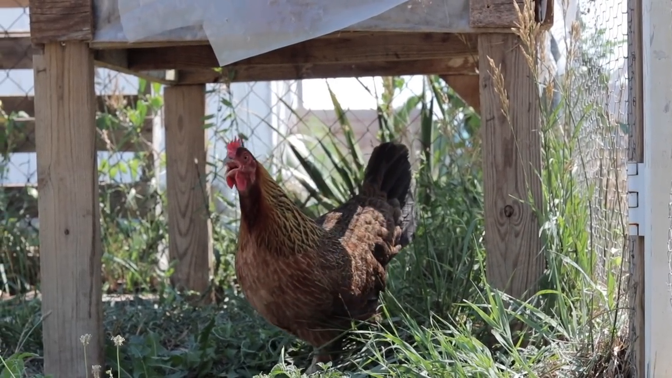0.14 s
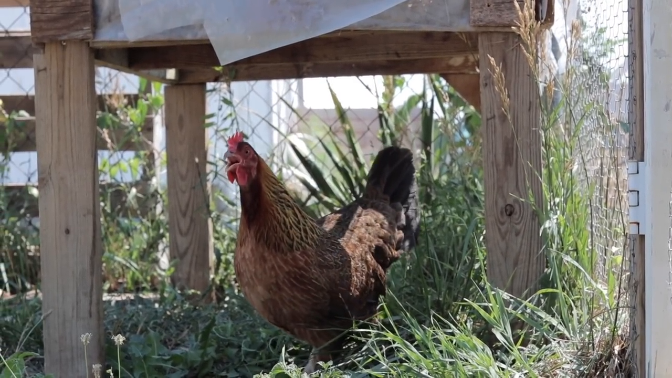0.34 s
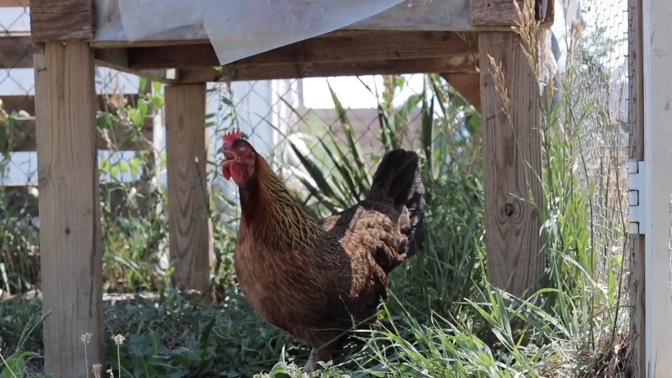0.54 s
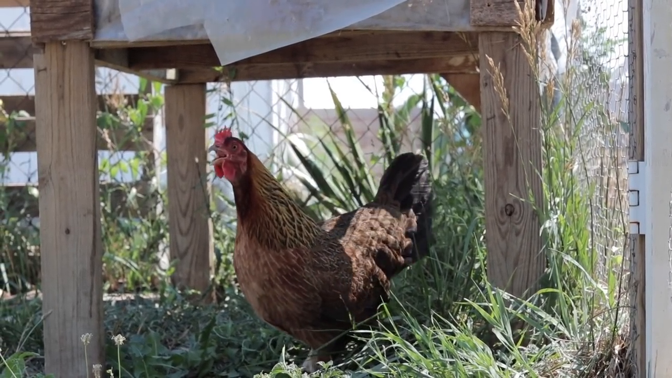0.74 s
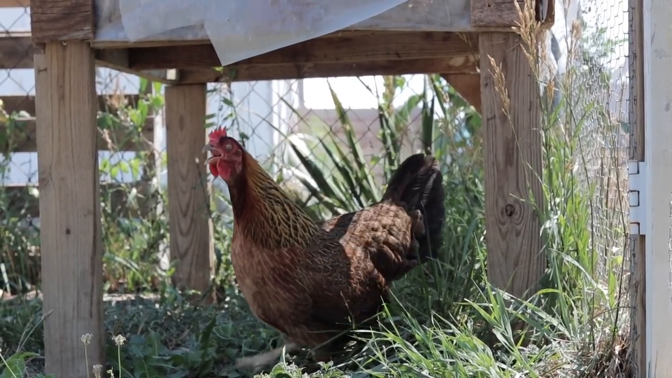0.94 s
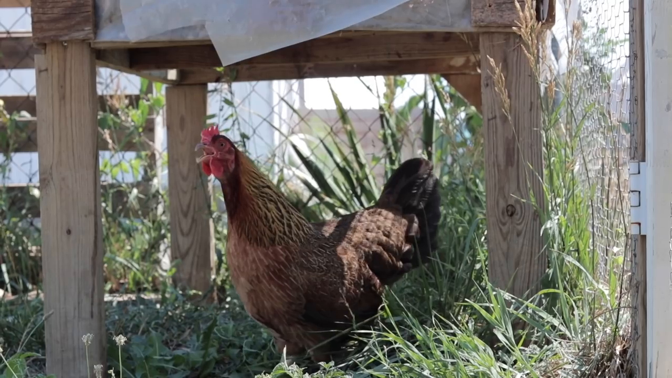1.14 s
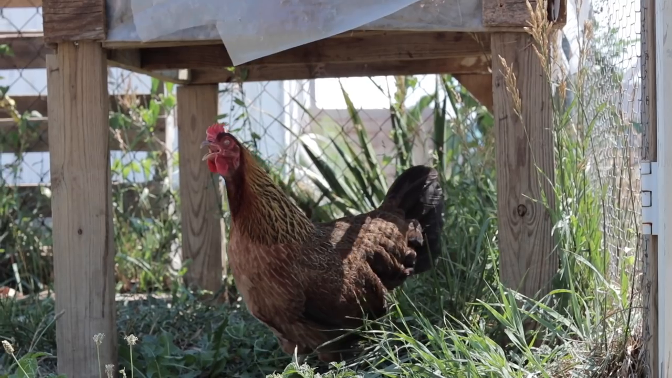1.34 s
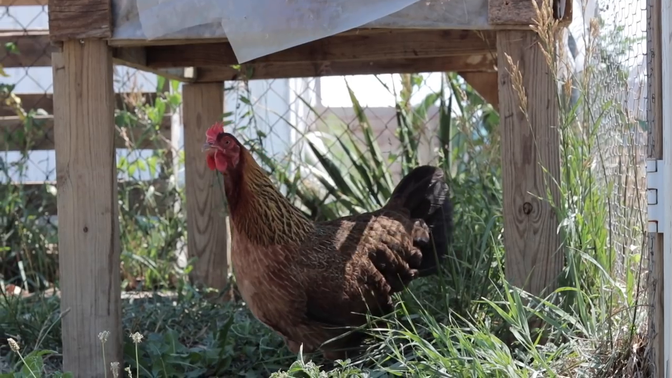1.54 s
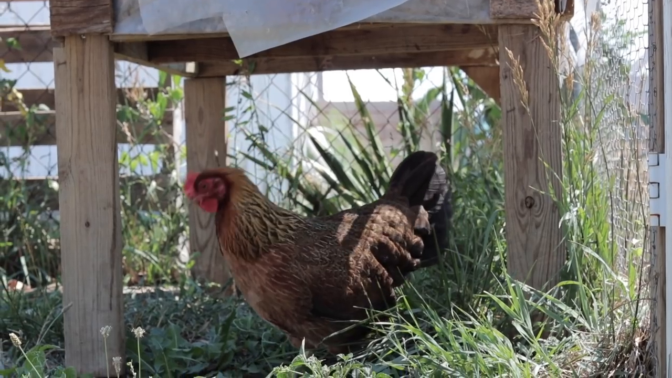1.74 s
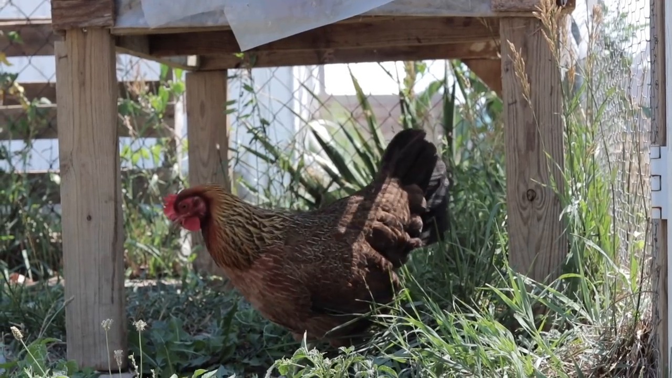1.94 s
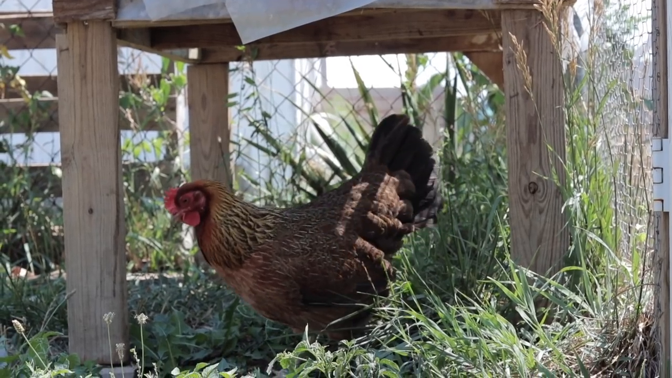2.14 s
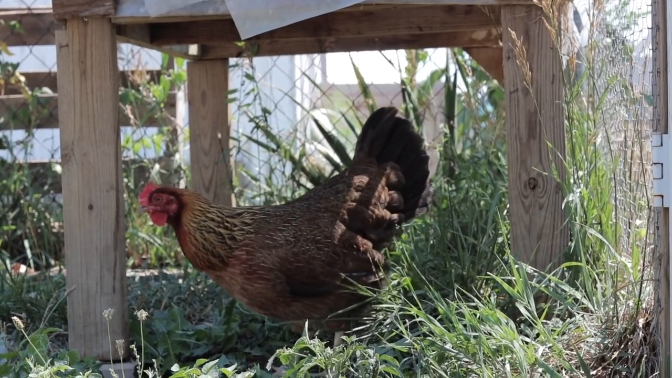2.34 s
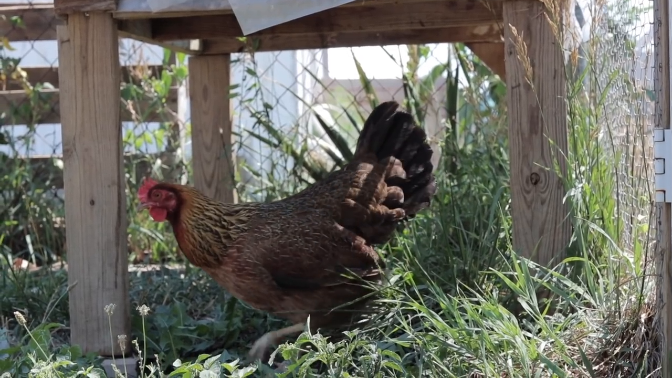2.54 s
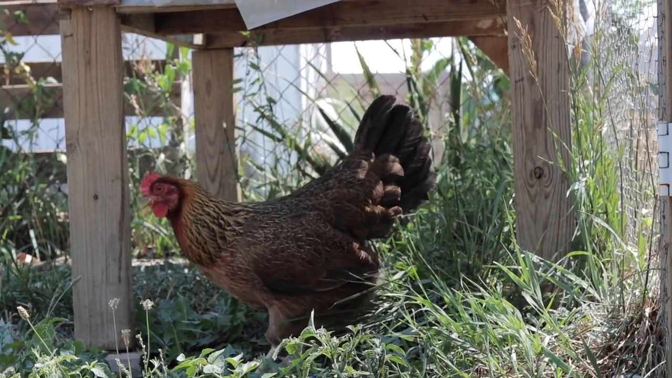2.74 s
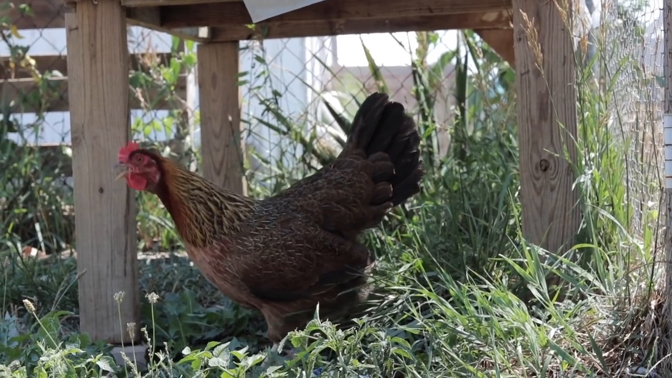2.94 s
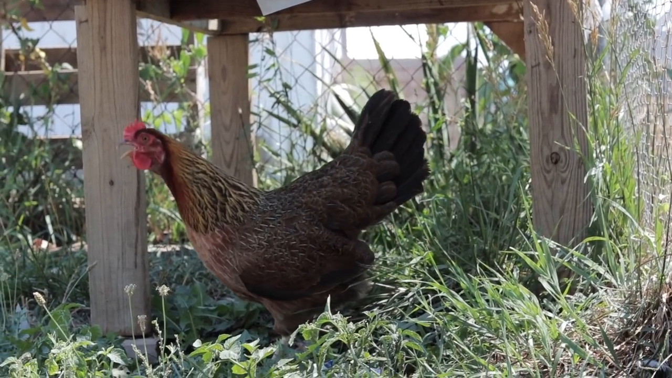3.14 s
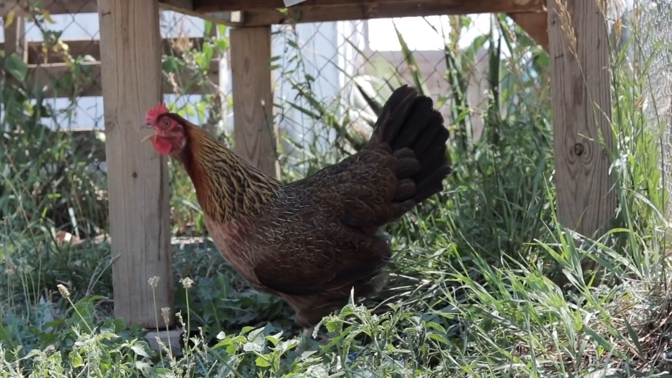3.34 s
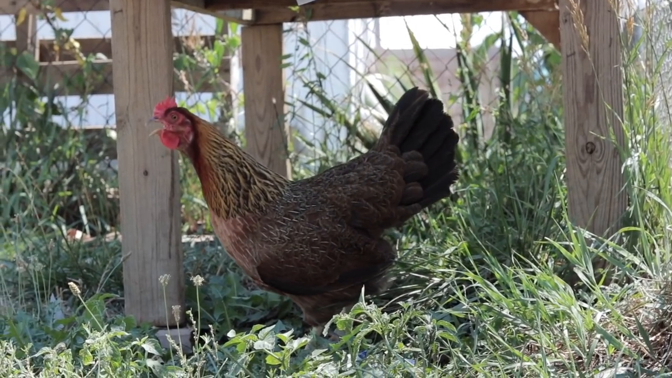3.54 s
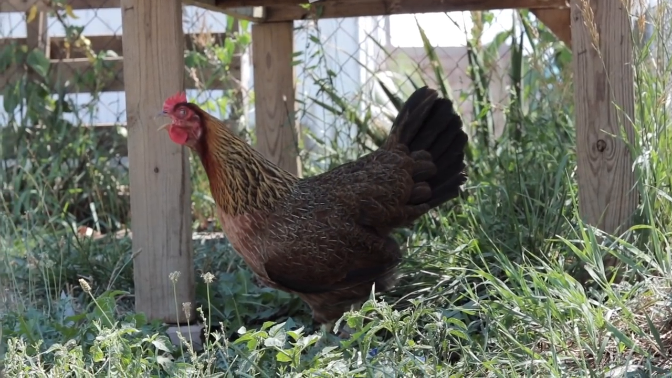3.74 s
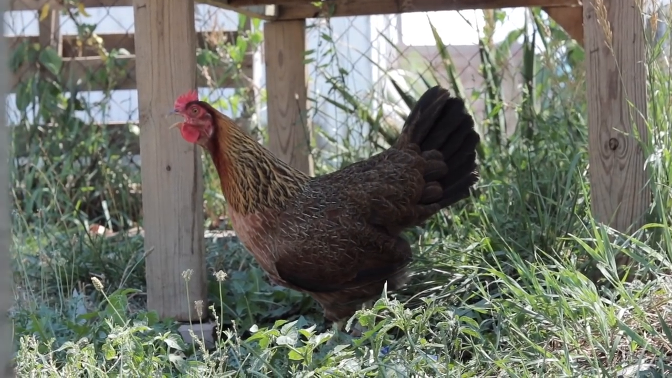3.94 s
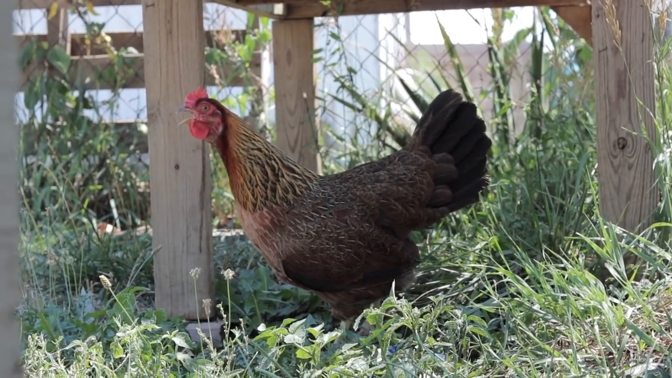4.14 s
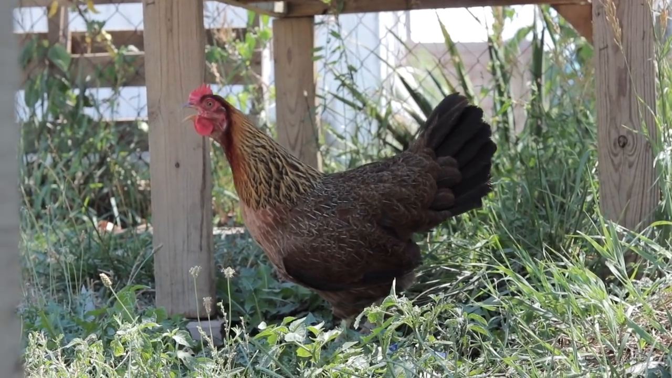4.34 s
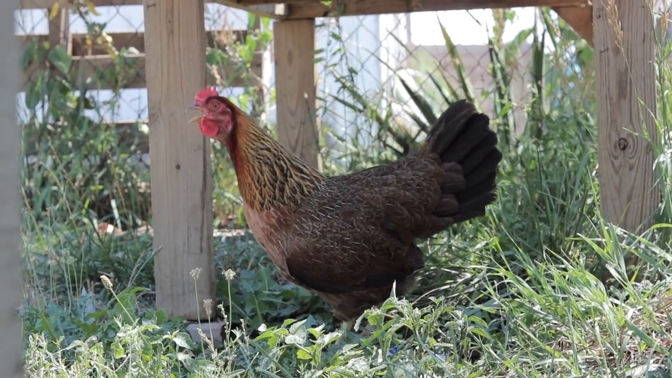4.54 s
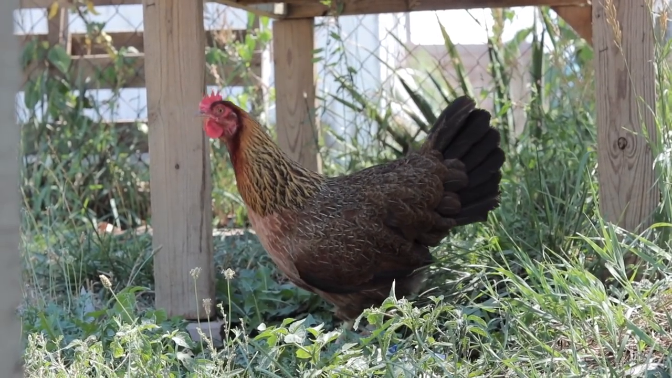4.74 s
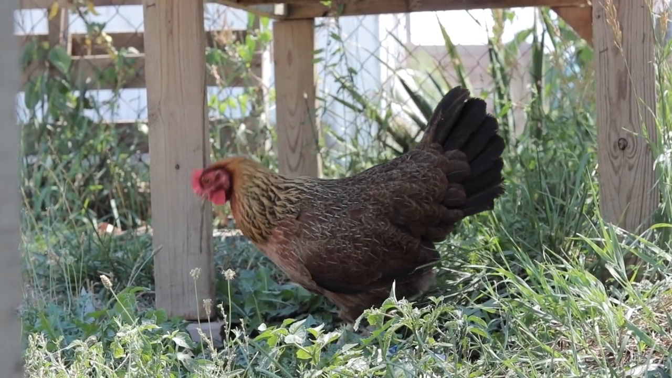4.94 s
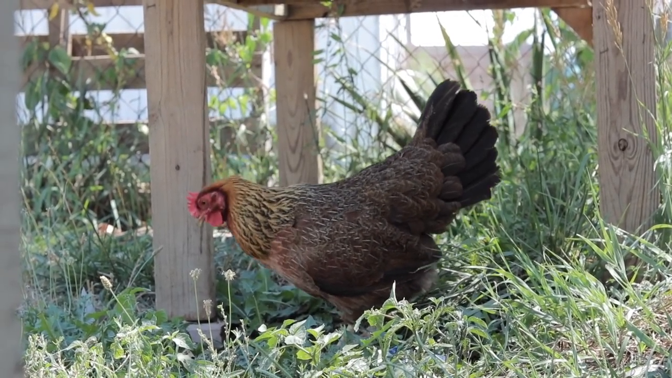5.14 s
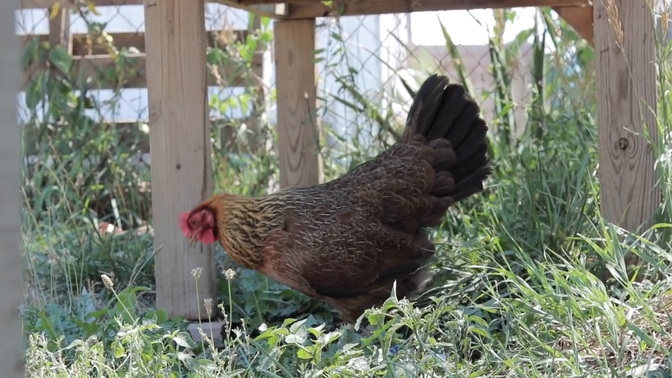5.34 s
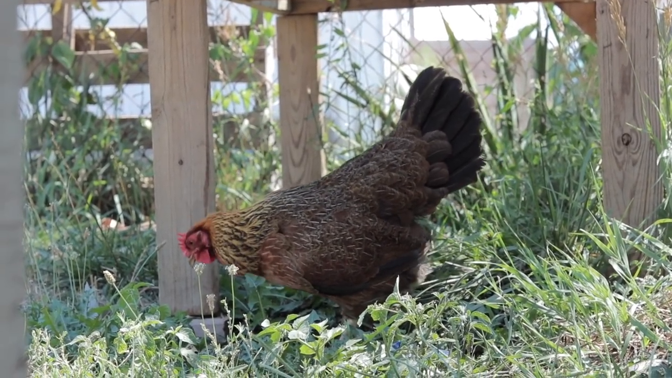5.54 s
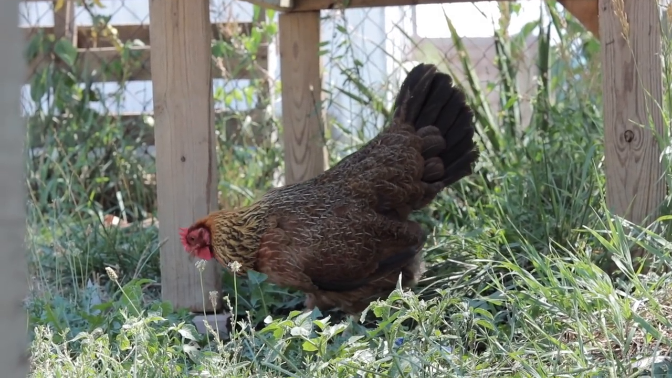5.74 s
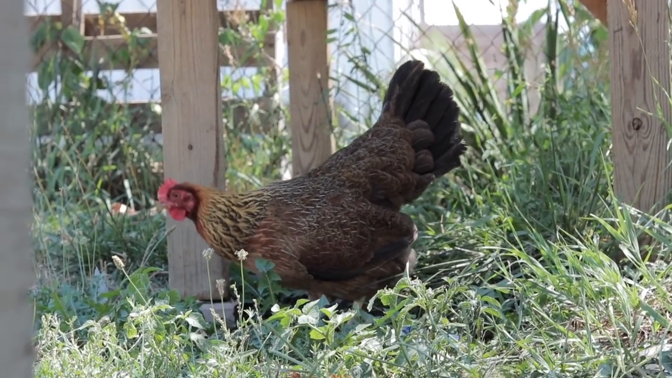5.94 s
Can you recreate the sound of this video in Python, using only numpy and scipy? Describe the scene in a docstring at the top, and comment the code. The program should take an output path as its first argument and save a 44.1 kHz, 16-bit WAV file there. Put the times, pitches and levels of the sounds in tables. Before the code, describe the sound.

Close by in a quiet yard, a hen screams twice, long and drawn out, the second call rising from a raspy croak.

```python
"""A hen under a wooden coop screams twice, each scream held near one pitch. Her breath sets membranes
beating, and windpipe and mouth shape the partials; now and then a cycle comes late and the voice
stumbles. Coop and fences echo her. A second hen croons softly from afar, small birds twitter, hollow
taps sound, grass rustles, a machine hums and wind touches the microphone."""
import sys
import numpy as np
from scipy import signal
from scipy.fft import rfft, irfft, next_fast_len
from scipy.io import wavfile
from scipy.ndimage import uniform_filter1d, map_coordinates

SR = 44100
rng = np.random.default_rng(int(sys.argv[2]) if len(sys.argv) > 2 else 0)


def to_wav(s):
    """Save 16-bit WAV."""
    ch = np.atleast_2d(s).T  # columns
    pcm = np.round(np.clip(ch, -1, 1) * 32767)  # PCM
    wavfile.write(sys.argv[1], SR, pcm.astype(np.int16))


N = 264644
TIME = np.arange(N) / SR
REFERENCE_HZ = 550  # mid-scream pitch

# Stumbles, where one cycle comes late and the next ones catch up: t/s, lateness/cycles
STUMBLES = [(0.072, .041), (0.317, .02), (0.336, .074), (0.374, .018), (.47, .021), (0.487, .079),
            (.501, .023), (.512, .037), (0.539, .043), (0.57, .067), (0.579, .19), (.589, .039),
            (.799, .044), (.826, .15), (.835, .33), (0.852, .19), (0.866, .27), (.884, .44), (.896, .23),
            (0.97, .029), (1.503, .02), (2.904, .3), (2.932, .12), (2.964, .08), (3.039, .05), (3.085, .06),
            (4.571, .02), (4.607, .018), (4.692, .1)]
# Spells of alternating long and short cycles: t/s, length/s, shift/cycles
PERIOD_DOUBLING = [(1.545, .03, .008), (2.9, .06, .018), (2.96, .12, .006), (3.09, .085, .014),
                   (4.555, .03, .003), (4.645, .07, .007)]
# EQ of the treble partials: f/Hz, gain/dB
TREBLE_EQ = [(4200, -5), (5000, -2), (5530, -11), (6340, -9.5), (6940, -23.5), (7520, -23.5), (9500, -21)]
# EQ of the sheen, the partials above 8 kHz: f/Hz, gain/dB
SHEEN_EQ = [(8000, 5), (9500, -12), (11400, -16), (12800, -14.5), (15600, -25.5)]
# Treble notch that moves with the neck: t/s, f/Hz
NECK_NOTCH = [(0, 6040), (.16, 4200), (.45, 4140), (.52, 5570), (.8, 5480), (1.0, 5100), (1.35, 4760),
              (1.45, 4468), (3.2, 5885), (3.7, 5650), (3.95, 5220), (4.3, 5270), (4.5, 4990)]
def hen():
    """Beating membranes ring the windpipe; every disturbance of the beat spills between the partials."""
    pitch, voice_db, treble_db, sheen_db, breath_db, gate, fall = effort()
    rasp = amp(3 * wobble(35))  # roughness comes in patches
    late = np.zeros(N)
    late[[round(s * SR) for s, _ in STUMBLES]] = [depth for _, depth in STUMBLES]
    late = signal.fftconvolve(late, np.exp(-(np.arange(-300, 301) / SR / .0019) ** 2), "same")
    cycles = np.cumsum(pitch * (1 + .0015 * wobble(25))) / SR
    doubling = sum(shift * np.clip(np.minimum(TIME - s, s + length - TIME) * 100 + .5, 0, 1)
                   for s, length, shift in PERIOD_DOUBLING)
    cycles += doubling * (1 + .6 * wobble(60)) * np.sin(np.pi * cycles)  # tones between the partials
    cycles += .014 * amp(breath_db) ** .78 * rasp * wobble(260)  # a breathier voice beats less evenly
    source, grid = np.zeros(N), np.arange(0, N, 64)
    shape = [c[grid] for c in curves(MOUTH_MOVES)]
    notch_hz = curves(NECK_NOTCH)[0][grid]
    for k in range(1, 40):
        hz = k * pitch[grid]
        upper_mix, sheen_mix = np.clip((hz - 4050) / 200, 0, 1), np.clip((hz - 8000) / 1500, 0, 1)
        upper_db = (1 - sheen_mix) * (treble_db[grid] + along(TREBLE_EQ, hz))
        upper_db += sheen_mix * (sheen_db[grid] + along(SHEEN_EQ, hz))
        upper_db -= 14.5 * np.exp(-((hz / notch_hz - 1) / .07) ** 2)
        upper_db += 3.6 * wobble(7)[grid]
        lower_db = voice_db[grid] + mouth(hz, shape[:3], shape[3], shape[4:])
        db = (1 - upper_mix) * lower_db + upper_mix * upper_db
        db -= 10 * np.clip(hz / 1000 - 1.3, 0, 3) * fall[grid]  # highs go first in the break
        db += (.7 + 1.3 * upper_mix) * wobble(60)[grid]  # flutter
        if k == 1:
            db += .04 * np.clip(REFERENCE_HZ - hz, 0, 100)  # the body lifts a low fundamental
        gain = np.sqrt(2) * amp(db) / np.abs(throat(hz))  # offsets the throat's gain at this partial
        # High partials lose step with the beat; a stumble shifts them less than a turn.
        phase = 2 * np.pi * rng.random() * (k > 4) - .4 * k * k
        phase -= 3.5 * np.tanh(2 * np.pi * k * late / 3.5)
        source += np.interp(np.arange(N), grid, gain) * np.cos(2 * np.pi * k * cycles + phase)
    source *= 1 - np.clip(1.2 * late, 0, 1)  # stumbles duck the tone
    source += amp(voice_db + breath_db) * rasp * breath(cycles)
    return filtered(source * gate, throat)


# Pitch line of each scream until the voice breaks off: t/s, f/Hz
SCREAM_PITCH = [
    [(0.004, 499.8), (0.095, 525), (0.24, 545.8), (0.403, 551.8), (0.576, 569.6), (0.811, 571.7),
     (.88, 580.4), (.915, 579.8), (1.105, 572.1), (1.137, 566.2), (1.348, 550), (1.482, 528.3),
     (1.536, 531.7)],
    [(2.902, 222.4), (2.928, 336.2), (2.962, 376.2), (3.041, 440), (3.091, 462.5), (3.17, 481.4),
     (3.231, 522.3), (3.292, 530.7), (3.639, 564), (3.928, 572), (4.075, 576.3), (4.433, 549), (4.527, 532),
     (4.623, 513.7), (4.655, 518), (4.684, 505)],
]
# Balance of each scream: effort onset t/s, voice level/dB, treble level/dB, sheen re treble/dB
SCREAM_LEVELS = [(-.25, -27, -31.5, -14), (2.9, -29, -33, -16)]
def effort():
    """Breath pressure raises pitch, level and brightness together; each scream ends in a quick fall."""
    break_s, break_hz, break_db = .026, 170.1, 20.5
    slack_hz, full_hz, db_per_hz = 440, 571.4, .1373
    which = np.searchsorted([rows[-1][0] + .5 for rows in SCREAM_PITCH[:-1]], TIME)
    onset, base_db, top_db, sheen_offset_db = np.transpose(SCREAM_LEVELS)[:, which]
    first, last = np.array([(rows[0][0], rows[-1][0]) for rows in SCREAM_PITCH]).T[:, which]
    held, = curves(np.vstack(SCREAM_PITCH))
    age, from_end = np.maximum(TIME - onset, 0), np.minimum(TIME - last, 0)
    fall = np.clip((TIME - last) / break_s, 0, 1)
    voice_db = base_db + db_per_hz * (np.maximum(held, slack_hz) - REFERENCE_HZ) - break_db * fall ** 2
    dull_db = np.minimum(9 * ((full_hz - held) / 100) ** 2, 18)
    treble_db = top_db - dull_db - break_db * fall - 2.5 * np.exp(from_end / .24)
    sheen_db = treble_db + sheen_offset_db - 4.5 * age
    croak_db, tired_db, gasp_db = 30.5 * np.exp(-age / .22), 9 * np.exp(from_end / .15), 10.5 * fall
    breath_db = -21.5 + croak_db + tired_db + gasp_db  # relative to the voice
    gate = np.clip(np.minimum(TIME - first, last + break_s - TIME) / .0022, 0, 1)
    return held - break_hz * fall ** 1.3, voice_db, treble_db, sheen_db, breath_db, gate, fall


# Formant moves: t/s, low f/Hz, mid f/Hz, high f/Hz, notch f/Hz, low gain/dB, mid gain/dB, high gain/dB
MOUTH_MOVES = [(0.0, 1190, 2330, 3500, 3160.0, 19, 13.5, 6), (0.07, 1200, 2285, 3780, 2900.0, 17, 8.5, 7),
               (0.15, 1210, 2380, 3580, 2820.0, 9.5, 5, 10.5),
               (0.24, 1320, 2230, 3800, 2480.0, 4.5, 7.5, 6.5),
               (0.28, 1290, 2337, 3600, 2770.0, 15, 8.5, 2.0),
               (0.5, 1253, 2280.0, 3560, 2610.0, 12.5, 11, 1.5),
               (0.78, 1230, 2210, 3800, 2552, 8.5, 0.5, -4.5),
               (0.97, 1330, 2250, 3840, 2350.0, 6, -0.5, -10),
               (1.09, 1250, 2280.0, 3800, 2420.0, 11.5, -2, -7.5),
               (1.13, 1176, 2420, 3620, 2500.0, 14, 5.5, -6.5),
               (1.4, 1050, 2090, 3510, 2310.0, 13.5, 18.5, 4),
               (1.54, 1116, 1900.0, 3245, 2270.0, 18.5, 9, 11),
               (2.92, 1113, 3083, 4370, 3090.0, 12, 7, -7.5),
               (2.97, 1110, 2570, 3900, 3220.0, 21.5, 12.0, -3),
               (3.03, 1040, 2230, 3730.0, 2870.0, 14.5, 11, -3.5),
               (3.09, 920, 2330.0, 3710.0, 2910.0, 16, 12.5, 5),
               (3.19, 1170.0, 2260, 3590, 2710.0, 21.5, 7, 0.5),
               (3.25, 1117, 2000, 3670, 2910.0, 9.5, 8, 6), (3.4, 1125, 2240, 3450, 2750.0, 18, 16, -7),
               (3.7, 1187, 2060, 3420, 3040.0, 15, 4.5, 2),
               (4.0, 1080, 2200.0, 3670, 3030.0, 11.5, -10.5, -3.0),
               (4.2, 1113, 2120, 3540, 3120.0, 14.5, 1.5, -4),
               (4.45, 1043, 2125, 3210, 3200.0, 19.5, 4, 7.5),
               (4.54, 1117, 2510, 3630, 2660.0, 15.5, 17, 0),
               (4.68, 1086, 2150.0, 3330, 2160.0, 17.5, 10, 5)]
def mouth(hz, centres, notch_hz, levels):
    """Gain in dB of three formants and a notch, shifted by neck and beak, over a sloping floor."""
    widths_hz, skirt, tilt_db_per_octave = (178, 270, 381), 2.74, -7.5
    power = amp(tilt_db_per_octave * np.log2(hz / REFERENCE_HZ)) ** 2
    for centre, width, db in zip(centres, widths_hz, levels):
        power += amp(db) ** 2 / (1 + ((hz - centre) / width) ** 2) ** skirt
    return 10 * np.log10(power) - 20 * np.exp(-((hz - notch_hz) / 330) ** 2)


# Windpipe resonances: f/Hz, width/Hz, gain/dB
WINDPIPE_MODES = [(525, 75, -8), (1127, 153, 2), (2200, 130, -5.5), (3617, 650, -3), (4780, 210, -17.5)]
def throat(hz):
    """The windpipe resonates, and a side cavity cuts a band around 2800 Hz."""
    peaks = .07 + sum((-1) ** k * amp(db) * 1j * hz * width / (centre ** 2 - hz ** 2 + 1j * hz * width)
                      for k, (centre, width, db) in enumerate(WINDPIPE_MODES))
    cavity = 2800 ** 2 - hz ** 2
    return peaks * (cavity + 1j * hz * 150) / (cavity + 1j * hz * 900)


# Colour of the breath: f/Hz, gain/dB
BREATH_EQ = [(300, -24), (900, 1), (2600, -2), (3600, -6), (9000, -30), (16000, -46)]
def breath(cycles):
    """Air escapes in one puff per cycle of the membranes."""
    return (1 + np.cos(2 * np.pi * cycles)) * noise(BREATH_EQ)


# Ring after a stumble: f/Hz, relative level/dB, t60/s
SLAP_MODES = [(1155, -1, 0.061), (2060, -7, 0.0073), (3253, -5, 0.015), (3772, -8, 0.05)]
def slaps():
    """A late cycle closes harder and rings the windpipe, louder the later it is and the stronger she is."""
    out, t, voice_db = np.zeros(N), TIME[:SR // 20], effort()[1]
    attack = 1 - np.exp(-t / .00086)
    for s, depth in STUMBLES:
        spread = rng.standard_normal((len(SLAP_MODES), 2))
        ring = sum(amp(db + 1.5 * accent - 60 * t / t60) * np.sin(2 * np.pi * hz * (1 + .051 * bend) * t)
                   for (hz, db, t60), (accent, bend) in zip(SLAP_MODES, spread))
        strength = .62 * np.tanh(depth / .3) * amp(voice_db[round(s * SR)] + 21)
        place(out, s, strength * attack * ring)
    return out


# Short reverb under the coop: f/Hz, t60/s
COOP_DECAY = [(300, 0.12), (1000, 0.16), (3500, 0.11), (9000, 0.014)]
# Longer reverb off the fences: f/Hz, t60/s
FENCE_DECAY = [(300, 0.37), (1000, 0.61), (3500, 0.41), (9000, 0.21)]
def echoes(x, decay):
    """Diffuse reflections, each frequency dying at its own speed."""
    hz, t, spectrum = signal.stft(rng.standard_normal(SR), SR, nperseg=256)
    tail = signal.istft(spectrum * amp(-60 * t / along(decay, hz)[:, None]), SR, nperseg=256)[1]
    return signal.fftconvolve(np.pad(x, (300, 0)), tail / np.linalg.norm(tail))[:N]


# The far hen's two calls: t/s, f/Hz, level/dB
CROONS = [
    [(1.6, 281.6, -62), (1.65, 290.8, -57), (1.8, 283, -60), (1.97, 279, -67.5)],
    [(4.87, 288.6, -63.5), (4.95, 278.3, -61), (5.1, 279, -65.5)],
]
# Her timbre: harmonic number, gain/dB
CROON_PARTIALS = [(1, 1.5), (2, -8.5), (3, -10), (4, -12)]
def far_hen():
    """A soft low croon, slightly unsteady."""
    pitch, db = curves(np.vstack(CROONS))
    cycles = np.cumsum(pitch * (1 + .007 * wobble(45))) / SR
    voice = sum(amp(gain + 4.2 * wobble(17)) * np.sin(2 * np.pi * k * cycles)
                for k, gain in CROON_PARTIALS)
    gate = sum(np.clip(np.minimum(TIME - call[0][0], call[-1][0] - TIME) / .02, 0, 1) for call in CROONS)
    return np.sqrt(2) * amp(db) * gate * voice


# Twitters, mostly rising: t/s, length/s, first f/Hz, last f/Hz, relative level/dB
TWITTERS = [(2.18, 0.057, 1573, 1627, -62.5), (2.3, .07, 1660, 1735, -64), (2.36, 0.038, 1800, 2000, -64.5),
            (2.449, 0.056, 1770, 1770, -64), (2.491, 0.073, 2105, 2430, -60),
            (2.624, 0.055, 1735, 2070, -65), (2.663, 0.11, 2276, 2350, -58.5),
            (5.43, .05, 1260, 1240, -62.5)]
def birds():
    """Short far whistles that glide, flutter and waver."""
    out = np.zeros(N)
    flutter = amp(4 * wobble(60) + 4 * wobble(300) - 4.5)
    waver = 55 * wobble(200)
    for s, length, first_hz, last_hz, db in TWITTERS:
        progress = np.arange(round(length * SR)) / (length * SR)
        hz = first_hz + (last_hz - first_hz) * progress ** 2
        hz += waver[round(s * SR):][:len(hz)] * (first_hz / 2300) ** 3
        place(out, s, amp(db) * np.sin(np.pi * progress) ** .5 * np.sin(2 * np.pi * np.cumsum(hz) / SR))
    return out * flutter


# Small hollow taps: t/s, level/dB, f/Hz
HOLLOW_TAPS = [(2.047, -48.5, 240), (2.286, -44.5, 296), (2.439, -45.5, 310), (2.543, -47.5, 233),
               (5.126, -44, 377), (5.225, -51.5, 447), (5.369, -50, 425), (5.657, -50.5, 407)]
def taps():
    """Each tap is one damped hollow note with a faint dull tick."""
    out, t = np.zeros(N), TIME[:SR // 10]
    for s, db, hz in HOLLOW_TAPS:
        note = amp(-60 * t / .075) * np.sin(2 * np.pi * hz * t)
        tick = .4 * amp(-60 * t / .012) * uniform_filter1d(rng.standard_normal(len(t)), size=7)
        place(out, s, amp(db) * (note + tick))
    return out


# Colour of the wind rumble: f/Hz, gain/dB
WIND_EQ = [(8.8, -35), (15, 3.5), (59, -0.5), (91, -6.5), (156, -15.5), (200, -19.5), (260, -52),
           (440, -120)]
# Gusts: peak t/s, half length/s, rise/dB
GUSTS = [(3.55, 0.25, 6), (4.9, 0.18, 13), (5.2, 0.18, 11.5), (5.85, 0.35, 18)]
def wind():
    """Gusts buffet the microphone with a lumpy rumble."""
    return amp(-65 + swells(GUSTS)) * unit(amp(3.3 * wobble(11)) * noise(WIND_EQ))


# Colour of the grass: f/Hz, gain/dB
GRASS_EQ = [(120, -38), (200, -9), (298, -5.5), (795, -26.5), (1220, -16.5), (1550, -29.5), (1760, -31.5),
            (6000, -34.5), (7800, -64.5), (13200, -120)]
# Rustles: peak t/s, half length/s, rise/dB
GRASS_SWELLS = [(2.42, 0.25, 12.5), (3.3, 0.28, 11), (4.65, .2, 19.5), (5.5, .1, 3.5)]
def grass():
    """Grass rustles in grainy swells."""
    return amp(-69 + swells(GRASS_SWELLS)) * unit(amp(2.5 * wobble(45)) * noise(GRASS_EQ))


# Tones of the hum: f/Hz, relative level/dB
HUM_TONES = [(83, -69.5), (235, -63)]
def machine():
    """A machine hums on two low, wavering tones."""
    return sum(amp(db + 1.5 + .82 * wobble(12)) * np.sin(2 * np.pi * hz * TIME + .5 * wobble(11))
               for hz, db in HUM_TONES)


# Colour of the outdoor bed: f/Hz, gain/dB
AIR_EQ = [(60, -29.5), (100, -10.5), (250, -10), (500, -15), (1200, -21.5), (1700, -26.5), (5000, -28),
          (7000, -34.5), (15700, -36.5)]
def air():
    """Still air lays a faint, nearly steady hush under everything."""
    return amp(-63.5 + .28 * wobble(3)) * noise(AIR_EQ)


def amp(db):
    return 10 ** (np.asarray(db) / 20)


def unit(x):
    return x / np.sqrt(np.mean(x ** 2) + 1e-20)


def place(track, s, sound):
    track[round(s * SR):][:len(sound)] += sound


def along(points, hz):
    """Read (Hz, value) points on a log frequency axis."""
    f, values = np.transpose(points)
    return np.interp(np.log(hz + 1), np.log(f + 1), values)


def curves(rows):
    """One automation curve for each column after the time."""
    s, *columns = np.transpose(rows)
    return [np.interp(TIME, s, c) for c in columns]


def swells(rows):
    """Bell-shaped rises in dB."""
    return sum(db * np.exp(-((TIME - s) / half) ** 2) for s, half, db in rows)


def wobble(rate):
    """A smooth random curve, rate knots a second."""
    return map_coordinates(rng.standard_normal(int(N * rate / SR) + 4), [TIME * rate])


def filtered(x, response):
    """Apply a complex frequency response."""
    size = next_fast_len(N + SR // 2)
    return irfft(rfft(x, size) * response(np.fft.rfftfreq(size, 1 / SR)), size)[:N]


def noise(spectrum):
    """Coloured noise of rms 1."""
    return unit(filtered(rng.standard_normal(N), lambda hz: amp(along(spectrum, hz))))


def scene():
    """Mono mix: the screaming hen and her echoes in front, the yard behind."""
    voice = hen() + slaps()
    space = amp(-16) * echoes(voice, COOP_DECAY) + amp(-34.5) * echoes(voice, FENCE_DECAY)
    return (voice + space + far_hen() + birds() + taps() + wind() + grass() + machine() + air())[None]


def record(dry):
    """A brick-wall low-pass on the mix."""
    return filtered(dry[0], lambda hz: hz < 15725)[None]


dry = scene()
out = record(dry)
to_wav(out)
```